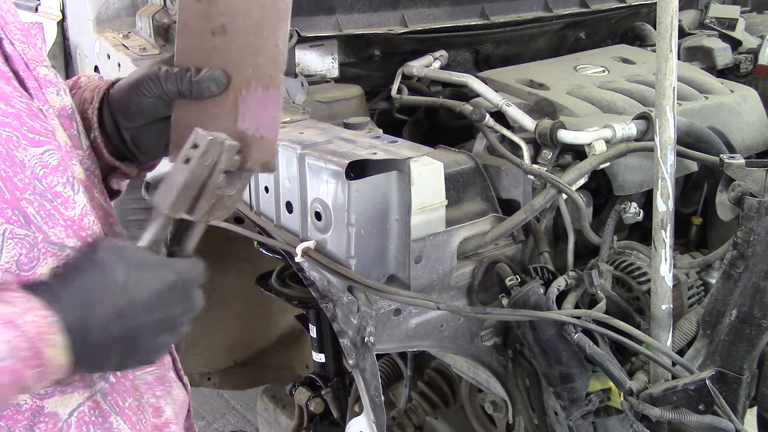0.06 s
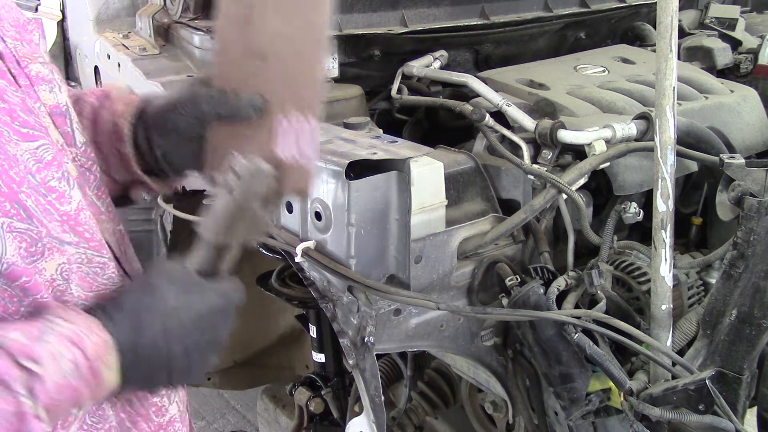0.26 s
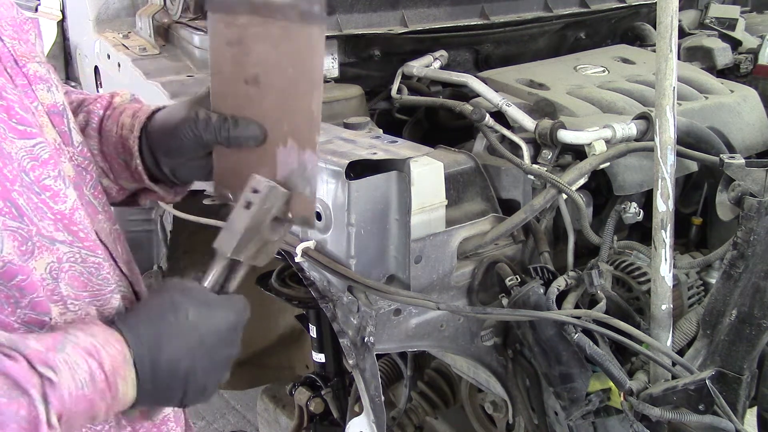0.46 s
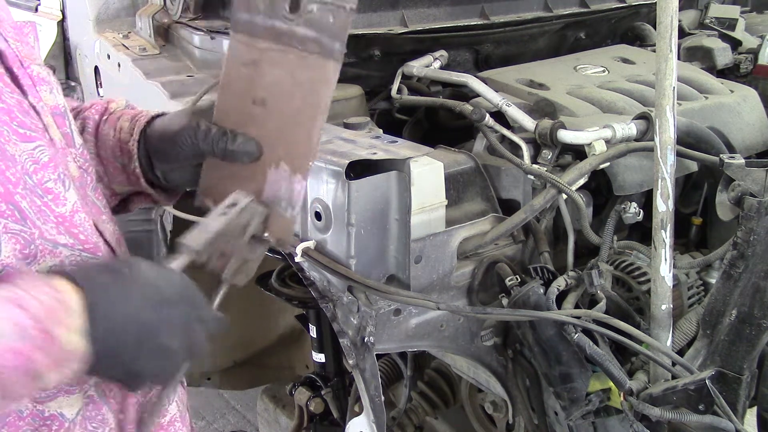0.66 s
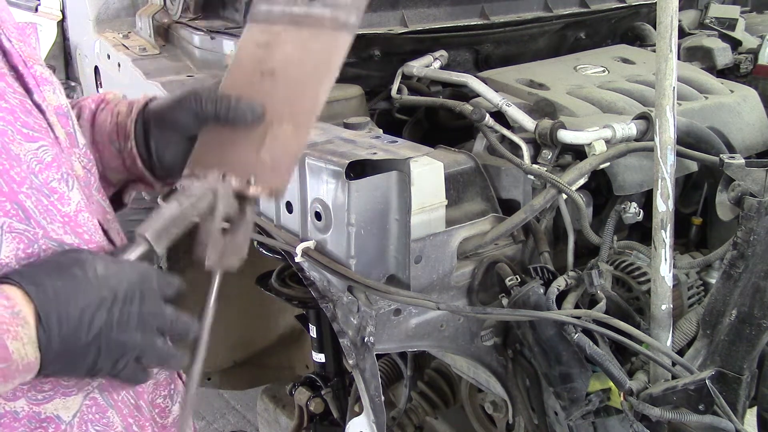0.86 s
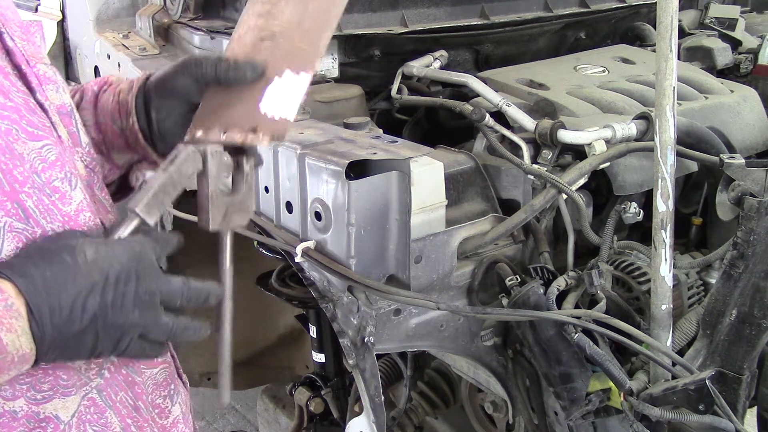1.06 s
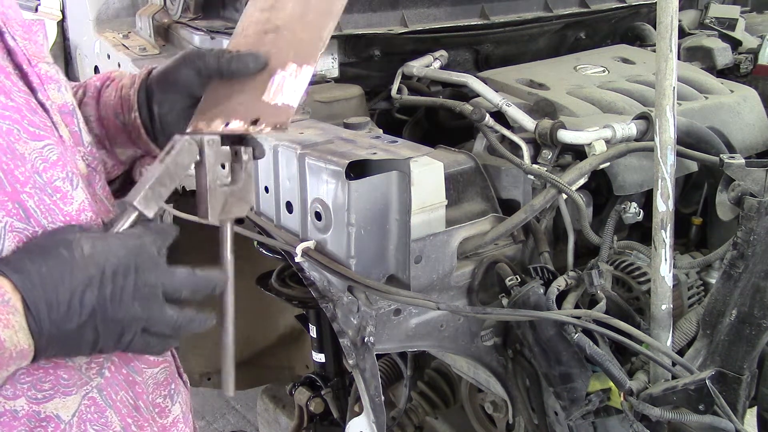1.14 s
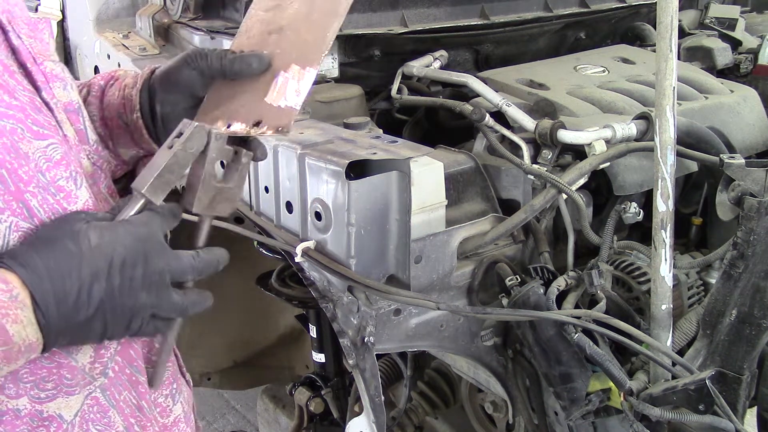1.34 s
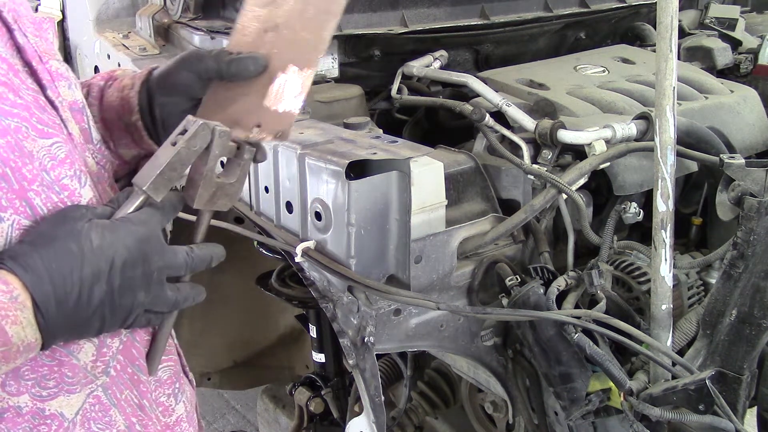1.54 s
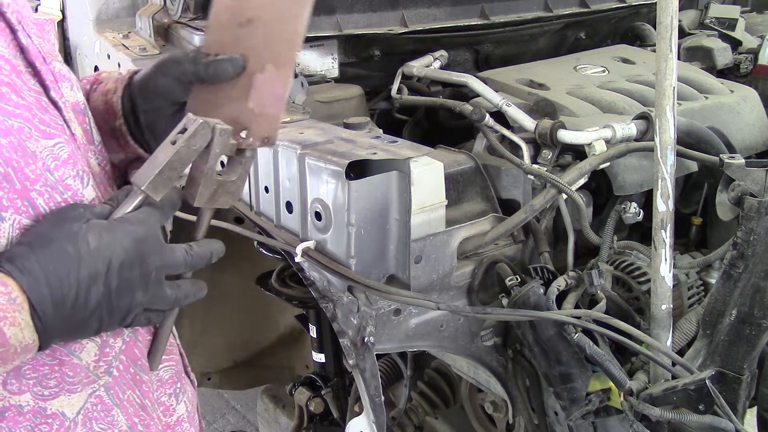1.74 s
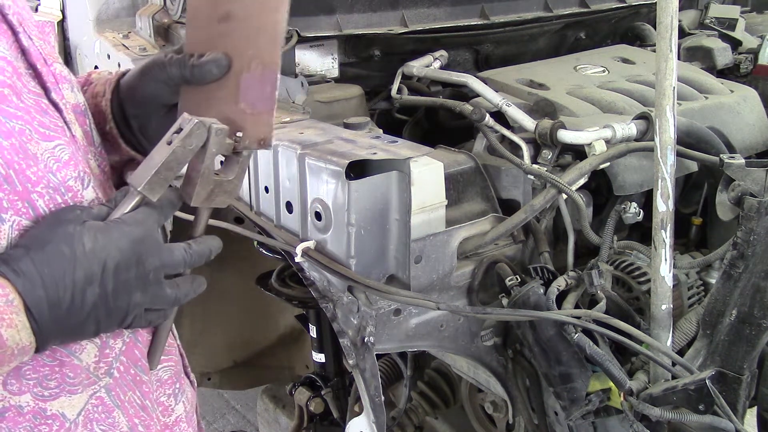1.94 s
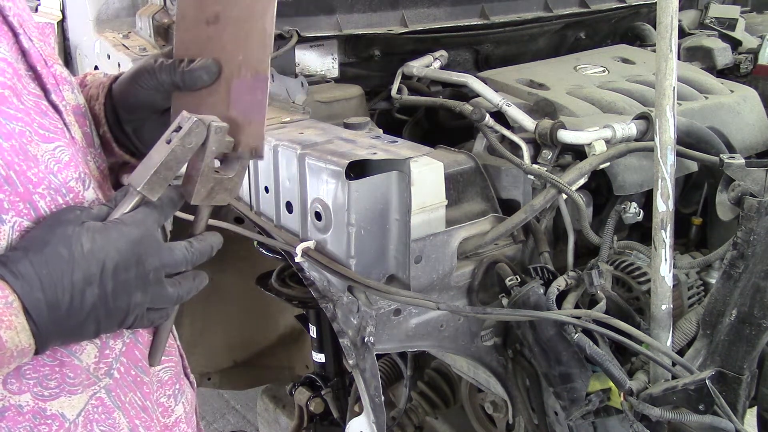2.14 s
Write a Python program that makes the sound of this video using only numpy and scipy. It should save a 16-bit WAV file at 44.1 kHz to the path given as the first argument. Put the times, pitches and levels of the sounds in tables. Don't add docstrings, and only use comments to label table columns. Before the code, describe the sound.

Close up in a reverberant garage, a hand punch cracks through hand-held sheet steel and clanks back with a short ring, then the lever rattles, the jaw knocks the sheet and settles over faint motor hum.

```python
import sys
import numpy as np
from scipy import signal
from scipy.io import wavfile

SR = 44100
rng = np.random.default_rng(int(sys.argv[2]) if len(sys.argv) > 2 else 0)


def bounce(signal):
    frames = np.transpose(np.atleast_2d(signal))
    limited = np.clip(frames, -1, 1)
    pcm = np.round(limited * 32767).astype(np.int16)
    wavfile.write(sys.argv[1], SR, pcm)


def field_ratio(decibels):
    return 10 ** (np.asarray(decibels, dtype=float) / 20)


N = 97020


def at_hz(points, hz):
    table_hz, value = np.array(points).T
    return np.interp(np.log(hz), np.log(table_hz), value)


def rms_one(x):
    return x / np.sqrt(np.mean(x ** 2) + 1e-20)


def band(x, low_hz, high_hz):
    edges_hz = [low_hz, min(high_hz, 0.45 * SR)]
    return signal.sosfilt(signal.butter(2, edges_hz, "band", fs=SR, output="sos"), x)


def drift(rate_hz):
    knots = rng.standard_normal(200)
    return np.interp(np.arange(N) / SR * rate_hz, np.arange(200), knots)


def stereo_noise(gain_at, alike_at, length):
    out = 0
    edges_hz = 22 * 2 ** np.arange(0, 10, 0.5)
    white = rng.standard_normal((2, 2, length))
    for k, (low_hz, high_hz) in enumerate(zip(edges_hz, edges_hz[1:])):
        centre_hz = np.sqrt(low_hz * high_hz)
        mid, side = band(white[k % 2], low_hz, high_hz)
        alike = np.clip(alike_at(centre_hz), 0, 1)
        pair = np.sqrt(1 + alike) * mid + np.sqrt(1 - alike) * side * [[1], [-1]]
        out = out + gain_at(centre_hz) * pair
    return out


# hz, level_db
TONE_COLOUR = [(30, -10), (52, -8), (141, -2), (500, -5.5), (1000, -5), (1600, -13), (6000, -22),
               (10000, -26.5), (16000, -26)]
# hz, alike_0_1
TONE_ALIKE = [(40, 0.87), (300, 0.74), (2000, 0.18), (6000, 1), (15000, 0.54)]
# hz, rms_db
MOTOR_HUM = [(150.7, -71), (301.5, -72), (597.5, -67.5), (1017, -71.5), (1340, -77.5)]
TONE_DB, TONE_LEFT_DB = -57, -1.3
PATCHY_DB, HUM_WANDER_DB = 1.2, -0.5


def room_tone():
    t = np.arange(N) / SR
    air = stereo_noise(lambda hz: field_ratio(at_hz(TONE_COLOUR, hz) + PATCHY_DB * drift(12)),
                       lambda hz: at_hz(TONE_ALIKE, hz), N)
    hum = 0
    for hz, rms_db in MOTOR_HUM:
        level = field_ratio(rms_db + 3.5 + HUM_WANDER_DB * drift(14))
        cycles = hz * t + 0.1 * drift(18) + rng.random()
        hum = hum + level * np.sin(2 * np.pi * cycles)
    balance = field_ratio([[TONE_LEFT_DB / 2], [-TONE_LEFT_DB / 2]])
    return (field_ratio(TONE_DB) * rms_one(air) + hum) * balance


# hz, t60_s
ROOM_T60 = [(100, 2.1), (300, .5), (700, 0.6758), (1840, 0.4568), (4850, 0.61), (9000, 0.37), (14000, 0.25)]
# hz, level_db
ROOM_COLOUR = [(100, -11), (400, 1.5), (1500, 6), (5000, -1.5), (9000, 1), (15000, -8)]
# hz, alike_0_1
ROOM_ALIKE = [(100, 0.5), (500, 1), (2500, 0.98), (5000, 0.97), (14000, 0.3)]
ROOM_RISE_S = 0.0034


def garage(feed):
    t = np.arange(SR) / SR
    rise = 1 - np.exp(-t / ROOM_RISE_S)
    tail = stereo_noise(lambda hz: rise * field_ratio(at_hz(ROOM_COLOUR, hz) - 60 * t / at_hz(ROOM_T60, hz)),
                        lambda hz: at_hz(ROOM_ALIKE, hz), SR)
    tail = tail / np.sqrt(np.sum(tail ** 2) / 2)
    return signal.fftconvolve(feed[None], tail, axes=1)[:, :N]


# centre_s, half_length_s, level_db, centre_hz, width_hz
GLOVE_RUBS = [
    (0.025, 0.048, -61, 7700, 4000),
    (0.11, 0.45, -56.5, 1700, 3130),
    (0.145, 0.52, -63.5, 9000, 11900),
    (1.127, 0.017, -56, 8600, 3570),
    (1.13, 0.007, -58.5, 9320, 12900),
    (1.09, 0.015, -69, 8440, 3018),
    (1.274, 0.011, -65.5, 6970, 4950),
    (2.111, 0.024, -67.5, 9000, 2870),
]


def gloves():
    out, t = 0, np.arange(N) / SR
    for centre_s, half_s, level_db, hz, width_hz in GLOVE_RUBS:
        grain = rng.standard_normal(N) * field_ratio(1.5 * drift(80))
        rub = rms_one(band(grain, max(hz - width_hz / 2.2, 100), hz + width_hz / 2))
        swell = np.exp(-0.5 * ((t - centre_s) / half_s) ** 2)
        out = out + field_ratio(level_db) * swell * rub
    return out


# low_hz, high_hz
CONTACT_BANDS = [(260, 850), (1300, 3700), (4600, 11270)]
CRACK_DB, MODE_DB, MODE_SCATTER_DB = 2.5, 1.7, 1.5
RING_TO_ROOM_DB = -5


def ring_modes(clicks, modes):
    ring = 0
    for click, (hz, level_db, t60_s) in zip(clicks, modes):
        radius = field_ratio(-60 / (t60_s * SR))
        w = 2 * np.pi * hz / SR
        gain = field_ratio(level_db + MODE_DB) * np.sin(w)
        ring = ring + signal.lfilter([0, gain], [1, -2 * radius * np.cos(w), radius * radius], click + 1e-18)
    return ring


def blows(rows, modes, sheet_db, sheet_t60_s, rise_ms):
    grit, clicks = np.zeros((3, N + SR)), np.zeros((len(modes), N))
    t = np.arange(SR // 4) / SR
    t_ms = t * 1000
    mode_band = [int(hz > CONTACT_BANDS[0][1]) + int(hz > CONTACT_BANDS[1][1]) for hz, _, _ in modes]
    signs = (-1.0) ** np.arange(len(modes))
    shimmer = field_ratio(np.array(sheet_db)[:, None] - 60 * t / np.array(sheet_t60_s)[:, None])
    rise = 1 - np.exp(-t_ms / rise_ms)
    for start_s, *levels_db, contact_ms in rows:
        i, gains = int(start_s * SR), field_ratio(np.array(levels_db))
        burst = rng.standard_normal((3, len(t))) * np.sqrt(rng.exponential(1, len(t)))
        shape = np.exp(-t_ms / max(contact_ms, 0.3)) + shimmer
        grit[:, i:i + len(t)] += gains[:, None] * burst * shape * rise
        scatter = field_ratio(MODE_SCATTER_DB * rng.standard_normal(len(modes)))
        clicks[:, i] += gains[mode_band] * scatter * signs
    crack = 0
    for g, (low_hz, high_hz) in zip(grit, CONTACT_BANDS):
        per_band = np.sqrt(SR / 2 / (high_hz - low_hz))
        crack = crack + field_ratio(CRACK_DB) * band(g[:N] + 1e-18, low_hz, high_hz) * per_band
    ring = ring_modes(clicks, modes)
    return np.array([crack + ring, crack + field_ratio(RING_TO_ROOM_DB) * ring])


# start_s, low_db, mid_db, high_db, contact_ms
SETTLE_BLOWS = [
    (2.0680, -39, -53.5, -48, 3.8),
    (2.0760, -49, -46, -59, 2.8),
    (2.0865, -56.5, -45, -56, 2.8),
    (2.0900, -52, -46, -69, 3),
    (2.1000, -70, -54, -66, 1.5),
    (2.1200, -63, -67, -55.5, 5.5),
]
# hz, level_db, t60_s
LOOSE_MODES = [(530, 0, .08), (652, -2.5, 0.24), (680, -4, .25), (712.6, -2.5, 0.13), (1640, 2, 0.018),
               (2700, 1, 0.02), (5700, -11, .015), (8470, -13.5, 0.033)]


def jaw_settles():
    return blows(SETTLE_BLOWS, LOOSE_MODES, (-16, -17, -21), (0.15, 0.1, 0.09), rise_ms=0.49)


# start_s, low_db, mid_db, high_db, contact_ms
KNOCK_BLOWS = [(1.1465, -56, -53.5, -71, 0.98), (1.2990, -74, -58, -71, 2.83),
               (1.5443, -45, -36.5, -39.5, 5.7), (1.5752, -41.5, -45, -42.5, 6.8),
               (1.5812, -34.5, -30, -46.5, 1.3), (1.5875, -53.5, -36.5, -32, 2.8),
               (1.6705, -44.5, -40.5, -56, 2.4), (1.6830, -45.5, -47.5, -53, 2.8),
               (1.7580, -49, -64, -57.5, 2.1), (1.9450, -74, -60.5, -63, 3.7), (1.5900, -66, -41, -43, .6),
               (1.5960, -50.5, -44, -44, 1.3), (1.6050, -50, -53, -54, 4.6), (1.6980, -60, -66, -69, 3),
               (1.7790, -63, -59, -72, 2)]
# hz, level_db, t60_s
GRIPPED_MODES = [(530, -3, 0.13), (580, -33, 0.046), (645, -4, 0.085), (676, -2.5, 0.11), (735, -4.5, 0.11),
                 (1094, -15.5, 0.18), (1417, -7, 0.056), (1710, -14.5, 0.082), (2215, -11, 0.061),
                 (2567, -6, 0.05), (3072, -6.5, 0.045), (3940, -4, 0.044), (5196, -1, 0.015),
                 (8540, -9.5, 0.036), (9000, -28, 0.032), (11280, -3, 0.014)]


def jaw_knocks():
    return blows(KNOCK_BLOWS, GRIPPED_MODES, (-15, -15, -21), (0.15, 0.13, 0.09), rise_ms=0.55)


# start_s, low_db, mid_db, high_db, contact_ms
LEVER_BLOWS = [(.2425, -43, -25, -19, 3.6), (.2480, -41, -49, -37, 2.8), (.2590, -47, -48, -25, 3.7),
               (.6182, -70, -47, -36.5, 0.47), (.6240, -66, -44, -24, 1.45), (.6268, -41, -39, -33.5, 2.2),
               (.6318, -69, -41, -27, 2), (.6514, -41.5, -27, -22, 6), (.6672, -37.5, -44.5, -28.5, 2.5),
               (.6550, -37, -33.5, -49, 1), (.6600, -55, -47.5, -36, 1.96), (.6780, -48.5, -36, -53, 3.7),
               (.6840, -63, -35.5, -52, 3), (.6885, -41, -37, -39, 3), (.6960, -52, -54, -43, 2.6),
               (.8980, -65, -80, -85, 1.8)]
# hz, level_db, t60_s
JAW_MODES = [(276, -10.5, 0.1), (722, -3, 0.051), (777.3, -1.5, 0.11), (1178.4, -12.5, 0.098),
             (1490, -17.5, .04), (1808, -14.5, 0.037), (2480, -10.5, .09), (3000, -2, 0.032),
             (5180, -12.5, 0.028), (6326, -27, 0.06), (7540, -12.5, 0.022), (10450, -18, 0.025)]


def lever_clacks():
    return blows(LEVER_BLOWS, JAW_MODES, (-16, -19, -24), (0.12, 0.12, 0.08), rise_ms=0.08)


# start_s, low_db, mid_db, high_db, contact_ms
RECOIL_BLOWS = [
    (.3660, -24.5, -9, -9.5, 2.3),
    (.3684, -44.5, -15.5, -17.5, 0.67),
    (.3712, -37.5, -16.5, -18, 1.1),
    (.3762, -37.5, -20, -22, 1.4),
    (.3828, -42.5, -16.5, -11.5, 1.4),
    (.3845, -37, -16, -20.5, 1.6),
]
# hz, level_db, t60_s
FREE_MODES = [(263.4, -8.5, 0.2), (416.7, -10.5, 0.14), (486, -7.5, 0.17), (653.3, 8.5, 0.15),
              (641.4, 3.5, 0.33), (750, -11.5, 0.08), (1290, -15, 0.056), (1694, -22.5, 0.19),
              (2470, -16, 0.18), (2796, -6, 0.045), (3337, -9.5, 0.035), (6900, -23, 0.03),
              (7395, -18, 0.023), (10800, -18, .025)]


def jaw_recoils():
    return blows(RECOIL_BLOWS, FREE_MODES, (-15, -15, -21), (0.16, 0.18, 0.14), rise_ms=0.036)


# start_s, low_db, mid_db, high_db, contact_ms
SNAP_BLOWS = [
    (.2772, -37, -15.5, -35.5, 0.62),
    (.2791, -26, -10.5, -3, 1.4),
    (.2880, -45.5, -31, -21.5, 1.4),
    (.2955, -46, -30, -11.5, 1.2),
    (.3012, -45, -32, -19.5, 1.1),
    (.3098, -45.5, -30.5, -20, 2.8),
    (.3170, -49, -27.5, -25.5, 1.5),
]
# hz, level_db, t60_s
CLAMPED_MODES = [(251, -0.5, 0.082), (812, -6, 0.45), (132, -10.5, .05), (787, -5.5, .45), (1190, -16, 0.2),
                 (1440, -13, 0.036), (2047, -15.5, 0.081), (2568, -14, 0.049), (2970, -17, 0.071),
                 (5110, -10.5, 0.037), (7000, -13.5, 0.053), (7900, -10.5, 0.046), (8600, -14, 0.03),
                 (9430, -24, 0.018), (11470, -16.5, 0.038), (14600, -23, 0.012)]


def punch_snaps():
    return blows(SNAP_BLOWS, CLAMPED_MODES, (-22, -18, -18), (0.12, 0.16, 0.2), rise_ms=0.1)


PORT_LAG_S, PORT_DB = 0.0004, -23.5


def scene():
    snap, recoil, lever = punch_snaps(), jaw_recoils(), lever_clacks()
    knocks, settle = jaw_knocks(), jaw_settles()
    metal = (snap + recoil + lever + knocks + settle)[0]
    feed = field_ratio(-7.5) * snap[1] + field_ratio(-8.5) * recoil[1] + field_ratio(-13.5) * lever[1]
    feed = feed + field_ratio(-11.5) * knocks[1] + field_ratio(-9) * settle[1]
    lagged = np.roll(metal, int(PORT_LAG_S * SR))
    side = field_ratio(PORT_DB) * band(lagged, 3500, 19000) * [[1], [-1]]
    return metal + side + garage(feed) + gloves() + room_tone()


def band_limit(x):
    return signal.sosfilt(signal.butter(12, 16510, fs=SR, output="sos"), x)


LOW_CUT_HZ, HIGH_CUT_HZ, SOFT_TOP = 48, 16700, 1.5


def record(dry):
    x = signal.sosfilt(signal.cheby2(12, 60, HIGH_CUT_HZ, fs=SR, output="sos"), dry)
    x = SOFT_TOP * np.tanh(x / SOFT_TOP)
    x = signal.sosfilt(signal.butter(2, LOW_CUT_HZ, "high", fs=SR, output="sos"), x)
    return band_limit(np.clip(x, -1, 1))


dry = scene()
out = record(dry)
bounce(out)
```